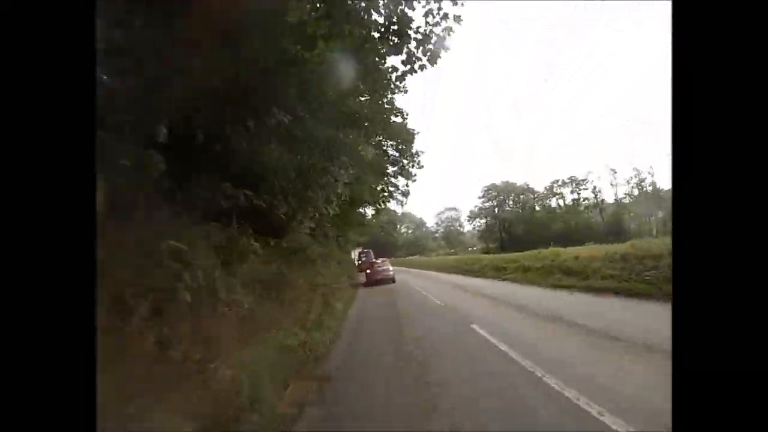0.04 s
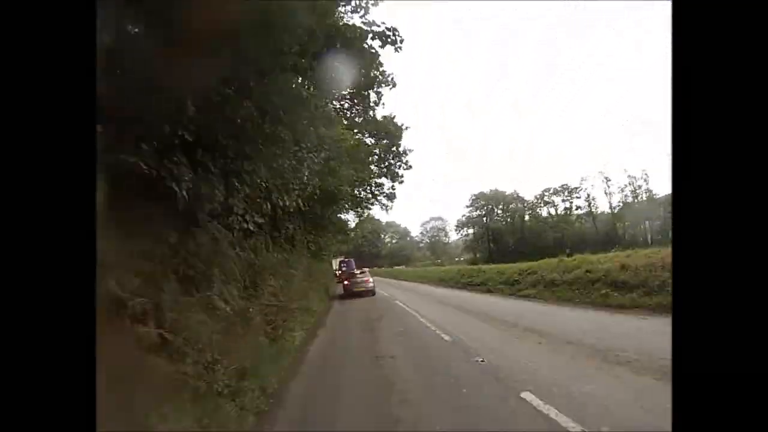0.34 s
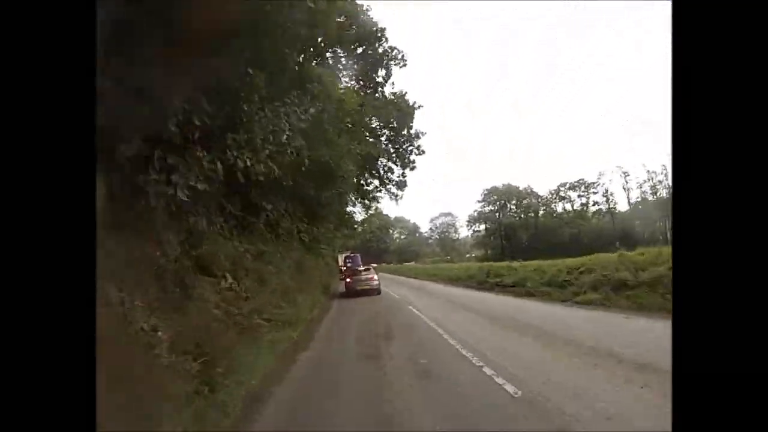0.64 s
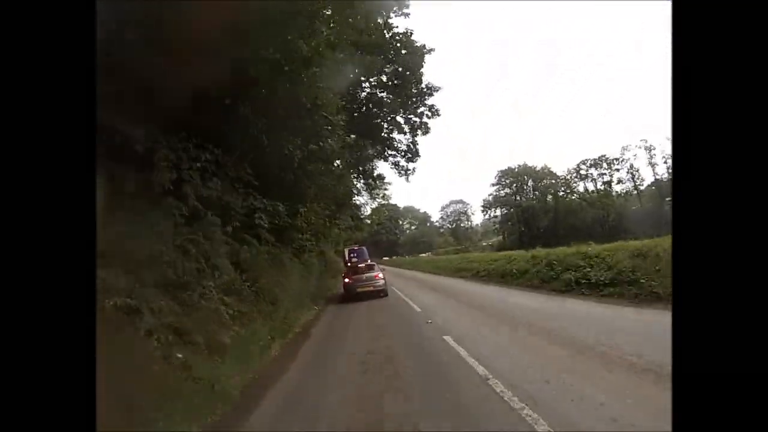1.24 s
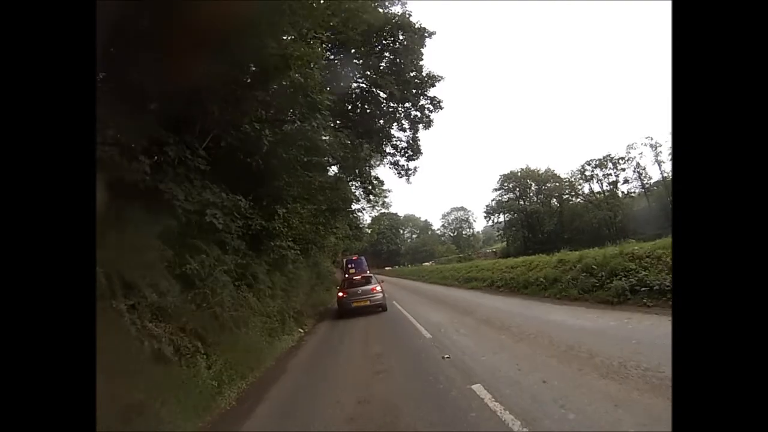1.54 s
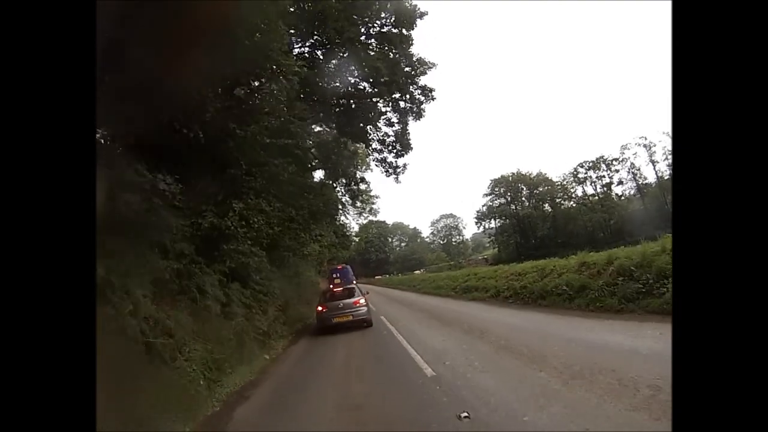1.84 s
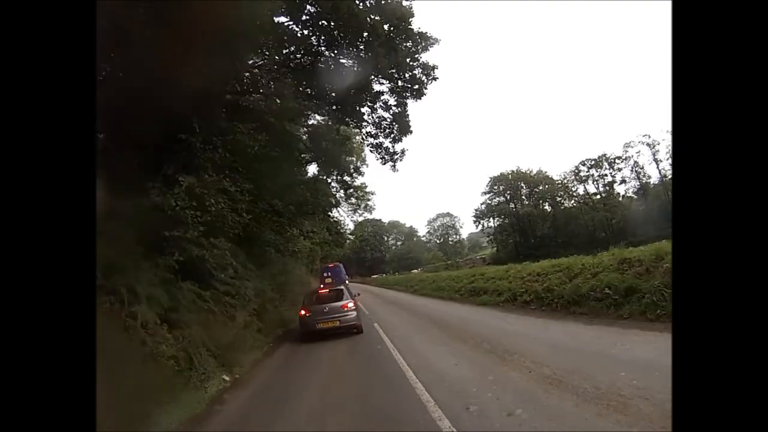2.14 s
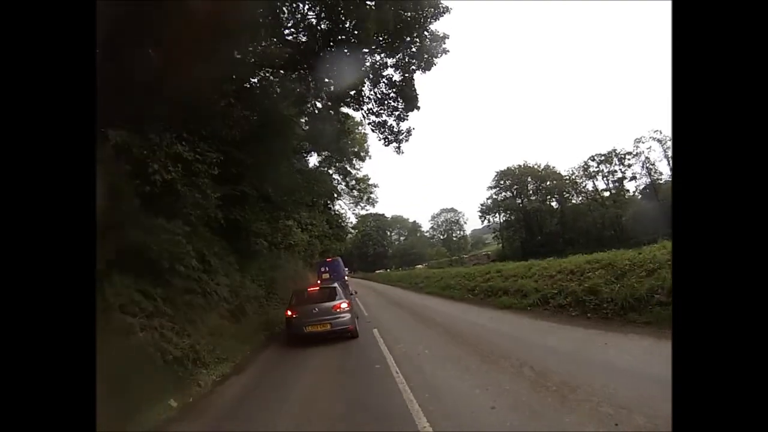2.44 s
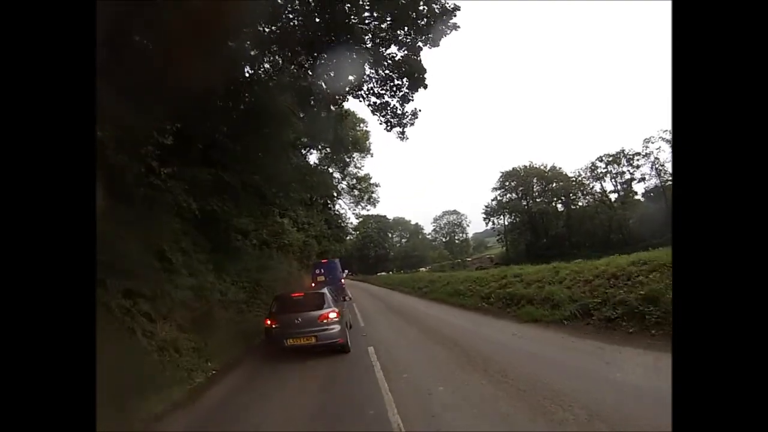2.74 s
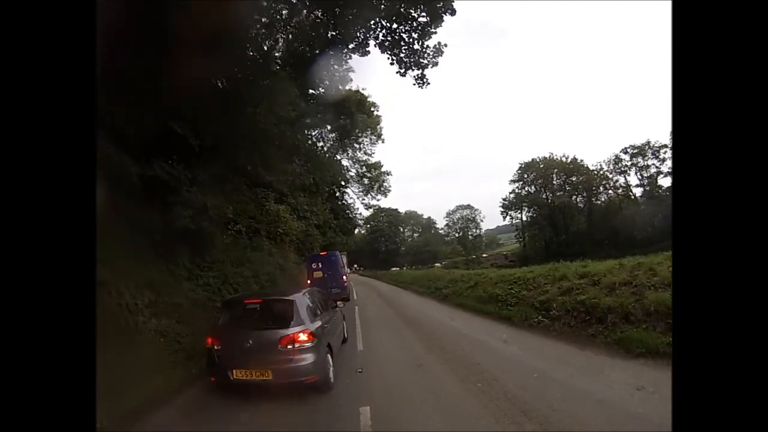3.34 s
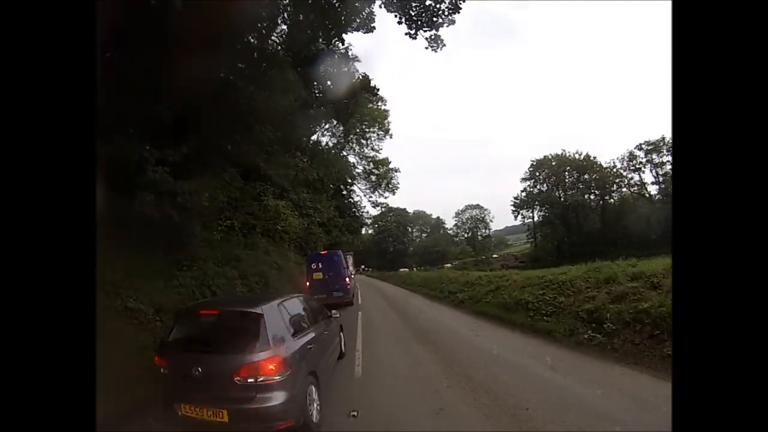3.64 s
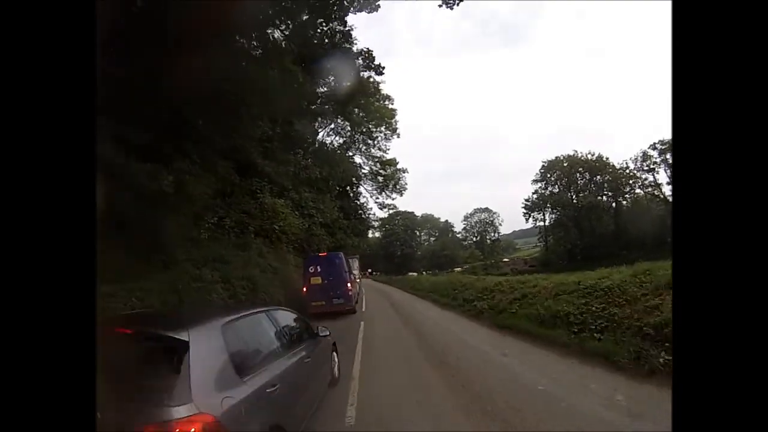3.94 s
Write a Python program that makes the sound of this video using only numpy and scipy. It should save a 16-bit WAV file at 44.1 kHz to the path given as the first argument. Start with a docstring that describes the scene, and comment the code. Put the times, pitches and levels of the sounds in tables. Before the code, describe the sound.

A motorbike's twin-cylinder engine chugs and clatters on a country road, heard from a camera riding along. Wind thumps and tyre rush dominate at first, then fade as the engine slows slightly. Something small knocks the camera housing once.

```python
"""Wind thumps and tyre rush, close on a camera's microphone in a plastic housing, out on the road.
Both die away early, the bright air fastest; then a motorbike's twin-cylinder engine slows a little,
clattering, its paired firings ringing the exhaust pipe in an uneven chug. Early on something small, a
drop or a bit of grit, knocks the housing once; loose parts rattle faintly here and there."""
import sys
import numpy as np
from scipy import signal
from scipy.fft import rfft, irfft, next_fast_len
from scipy.io import wavfile
from scipy.ndimage import uniform_filter1d, map_coordinates

SR = 44100
rng = np.random.default_rng(int(sys.argv[2]) if len(sys.argv) > 2 else 0)


def transcribe(signal):
    """Save signal, clipped to [-1, 1], as a 16-bit WAV file at the path in sys.argv[1]."""
    frames = np.atleast_2d(signal).T
    limited = np.clip(frames, -1, 1)
    pcm = np.round(limited * 32767).astype(np.int16)
    wavfile.write(sys.argv[1], SR, pcm)


N = 176400

# The housing's upper resonances. Each row: frequency in Hz, relative level in dB.
HOUSING_TREBLE = [(2600, -27), (3300, -4.5), (3480, 2.5), (3700, -1.5), (4250, -4), (4900, -0.5),
                  (5400, -4.5), (5700, -9.5), (6100, -8), (6700, -9), (7400, -14), (10000, -23.5),
                  (15000, -43)]


def amp(db):
    """Decibels to gain."""
    return 10 ** (np.asarray(db) / 20)


def unit(x):
    """Scale to rms 1."""
    return x / np.sqrt(np.mean(x ** 2) + 1e-20)


def clock():
    """The time of every sample in seconds."""
    return np.arange(N) / SR


def curves(rows):
    """One value per sample for each column after the time."""
    times, *columns = np.transpose(rows)
    return [np.interp(clock(), times, column) for column in columns]


def wobble(rate):
    """A smooth random curve, rate knots a second."""
    return map_coordinates(rng.standard_normal(4096), [clock() * rate], mode="wrap")


def filtered(x, response):
    """Filter x by a gain given as a function of frequency in Hz."""
    size = next_fast_len(N + SR // 2)
    return irfft(rfft(x, size) * response(np.fft.rfftfreq(size, 1 / SR)), size)[:N]


def noise(colour):
    """Noise of rms 1, coloured by rows of frequency in Hz and relative level in dB."""
    knots_hz, db = np.transpose(colour)
    gain = lambda hz: amp(np.interp(np.log(hz + 1), np.log(knots_hz + 1), db))
    return unit(filtered(rng.standard_normal(N), gain))


def even(x, size):
    """Hold the rms of x near 1 over about size samples."""
    power = uniform_filter1d(uniform_filter1d(x ** 2, size), size // 2)
    return x / np.sqrt(np.abs(power) + 0.0011)


def ring_down(start, attack, t60):
    """A quick rise and an exponential decay; all times in seconds."""
    age = np.maximum(clock() - start, 0)
    return (1 - np.exp(-age / attack)) * amp(-60 * age / t60)


def hiss():
    """A faint, steady hiss behind everything."""
    # Each row: frequency in Hz, relative level in dB.
    hiss_colour = [(1000, -31), (4000, 3.5), (7500, -2), (10000, -4.5), (13000, -8), (15000, -15)]
    return amp(-72) * noise(hiss_colour)


def tick(at_s=1.3875):
    """A faint click with no ring."""
    return amp(-35.5) * (np.arange(N) == round(at_s * SR))


def rattles():
    """Loose parts of the bike chink briefly."""
    # Each row: start in seconds, level in dB, t60 in seconds, bright edge against the body in dB.
    chinks = [(.128, -50, 0.037, 2), (0.942, -46, .03, -7), (1.931, -48, 0.17, -14),
              (2.542, -38.5, 0.024, -22), (2.924, -46, 0.068, -16), (2.961, -44, 0.069, -9.5)]
    # A chink's body and bright edge. Each row: frequency in Hz, relative level in dB.
    body_colour = [(600, -11), (1200, -15), (1550, 1), (1900, -10), (2500, -14), (3200, -12), (4500, -47)]
    edge_colour = [(2000, -22), (4000, 6), (5300, 9), (6700, -1), (8000, -11), (15000, -32)]
    body, edge = noise(body_colour), noise(edge_colour)
    return sum(amp(db) * ring_down(start, 0.0022, t60) * (body + amp(edge_db) * edge)
               for start, db, t60, edge_db in chinks)


def rush():
    """Tyres roar on the road under a brighter rush of air; both fade early, the air faster."""
    # The fade of both. Each row: time in seconds, relative level in dB.
    fade = [(0, -46.5), (.25, -50.5), (.5, -51.5), (1, -53.5), (1.5, -59.5), (2.5, -60), (4, -59.5)]
    # Tyre roar and rushing air. Each row: frequency in Hz, relative level in dB.
    tyre_colour = [(60, -19), (130, 1), (200, -0.5), (300, 0.5), (380, 0), (480, -1), (560, 1), (720, -6.5),
                   (830, -6.5), (940, -16.5), (1500, -35), (4000, -76)]
    air_colour = [(700, -18.5), (950, -14), (1230, -2), (1370, -2), (1510, 1.5), (1770, -5), (2080, -7),
                  (2240, -0.5), (2380, -7.5), (2500, -0.5), (2680, -15.5), (2920, -10.5), (3300, -24.5),
                  (4200, -50)]
    level_db, = curves(fade)
    top_db = level_db.max()
    tyres = noise(tyre_colour) * amp(level_db + 1.5 + 1.27 * wobble(15))
    air = noise(air_colour) + amp(-14.5) * noise(HOUSING_TREBLE)
    air_db = top_db + 4.5 + 1.69 * (level_db - top_db) + 1.2 * wobble(24.35)
    return tyres + air * amp(air_db)


def wind(cycles):
    """Eddies thump, flutter and slap on the housing; the flutter swells with the engine's beat."""
    # Each row: time in seconds, relative levels of the deep thumps and of the flutter in dB.
    buffeting = [(0.03, -27, -33), (0.12, -33.5, -37.5), (0.16, -25.5, -26.5), (0.26, -31, -40),
                 (0.29, -32, -26.5), (0.33, -28, -37.5), (0.44, -39, -55), (0.46, -35.5, -39),
                 (0.54, -33.5, -41.5), (0.76, -26, -39), (0.85, -35.5, -42), (0.92, -25, -37),
                 (1.0, -31.5, -43), (1.02, -33, -35), (1.3, -36.5, -44.5), (1.45, -46.5, -45),
                 (1.6, -37, -48.5), (1.72, -52.5, -46.5), (1.9, -46.5, -45), (2.14, -52.5, -48.5),
                 (2.25, -46.5, -46), (2.38, -50.5, -50), (2.53, -46.5, -42.5), (2.66, -51, -49),
                 (2.8, -44, -43.5), (3.18, -53.5, -50.5), (3.5, -45, -49), (3.65, -53, -50),
                 (3.9, -46, -51)]
    # Single eddies. Each row: start in seconds, level in dB.
    eddies = [(0.138, -20.5), (2.552, -34)]
    # The wind's three colours. Each row: frequency in Hz, relative level in dB.
    thump_colour = [(5, -6.5), (14, -0.5), (27, 3.5), (45, -8.5), (65, -23), (130, -44), (400, -77),
                    (2000, -130)]
    flutter_colour = [(35, -25.5), (60, -2.5), (84, 1), (100, -10.5), (125, -22), (170, -38.5), (220, -33),
                      (500, -80), (2000, -120)]
    slap_colour = [(30, -5), (80, 3), (160, -15), (300, -18.5), (700, -46), (2000, -120)]
    thump_db, flutter_db = curves(buffeting)
    calm = (thump_db.max() - thump_db) / np.ptp(thump_db)
    thumps = even(noise(thump_colour), size=4000)
    thumps *= amp(thump_db + 3 + 1.5 * calm * wobble(6.26))  # more fitful in slow air
    beat_db = 0.5 * np.cos(2 * np.pi * (cycles + 0.12))  # peaks just ahead of the first firing
    flutter = even(noise(flutter_colour), size=3500) * amp(flutter_db + beat_db)
    slap_envelope = sum(amp(db) * ring_down(start, attack=0.004, t60=0.079) for start, db in eddies)
    slaps = even(noise(slap_colour), size=800) * slap_envelope
    return thumps + flutter + slaps


def knock(start_s=0.7948, build_periods=3.8):
    """A drop or a bit of grit cracks on the housing and rings it; the low modes bloom last."""
    # Each row: frequency in Hz, relative level in dB, t60 in seconds.
    housing_modes = [(493, -1, 0.024), (790, -2.5, 0.029), (1222, -3, 0.052), (1480, -16, 0.041),
                     (1990, -2.5, 0.026), (2230, 4, 0.028), (2512, -4, 0.044), (2787, -6.5, 0.025)]
    # The first snap. Each row: frequency in Hz, relative level in dB.
    crack_colour = [(200, -2), (700, 3), (1700, 7), (2800, 2.5), (3400, 0), (5300, -15), (5800, -32),
                    (7000, -50)]
    age = clock() - start_s
    ring = np.zeros(N)
    for hz, db, t60 in housing_modes:
        tone = np.sin(2 * np.pi * hz * age + rng.uniform(0, 2 * np.pi))
        ring += amp(db) * tone * ring_down(start_s, build_periods / hz, t60)
    crack = even(noise(crack_colour), size=130) * ring_down(start_s, attack=0.00097, t60=0.013)
    return amp(-24) * (ring + amp(1.5) * crack)


def clatter(cycles, stroke_drop_db=5.5, fall_db_per_s=0.23):
    """Valve and piston noise jumps at each of the four strokes and dies down until the next."""
    # Each row: frequency in Hz, relative level in dB.
    metal_colour = [(500, -14), (800, -19.5), (930, -11), (1100, 0.5), (1300, -8), (1490, 2), (1700, -3),
                    (1800, -14.5), (1890, -4), (1970, -11), (2100, -4.5), (2350, -3.5), (2510, 1.5),
                    (2690, -16), (2930, -8.5), (3240, -21), (4200, -58)]
    stroke_phase = uniform_filter1d((4 * cycles - 0.16) % 1, size=90)
    swing_db = -stroke_drop_db * stroke_phase + 0.7 * np.cos(2 * np.pi * cycles) + 0.65 * wobble(110)
    grind = noise(metal_colour) + amp(-13.5) * noise(HOUSING_TREBLE)
    return unit(grind * amp(swing_db)) * amp(-53.235 - fall_db_per_s * clock())


def burns(cycles, place, jitter_s=0.00012, scatter_db=1):
    """One cylinder fires once a cycle, each pulse a little different in time and strength."""
    firing_cycles = np.arange(1, int(cycles[-1] - place) + 1) + place
    times = np.interp(firing_cycles, cycles, clock())
    late, strength = rng.standard_normal((len(times), 2)).T
    index = np.clip(np.round((times + jitter_s * late) * SR), 0, N - 1).astype(int)
    return np.bincount(index, amp(scatter_db * strength), N)


def silencer(pulses, modes, muffle_hz=1100):
    """The silencer dulls the pulses and they ring the given resonances; scaled to rms 1."""
    def response(f):
        return sum((-1) ** k * amp(db) * 1j * f * width / (hz * hz - f * f + 1j * f * width)
                   for k, (hz, width, db) in enumerate(modes))
    muffled = signal.sosfilt(signal.butter(2, muffle_hz, fs=SR, output="sos"), pulses)
    return unit(filtered(muffled, response))


def exhaust(cycles, rise_db_per_s=0.03):
    """A pair of pulses rings the pipe, then a long gap follows; a low boom marks each cycle."""
    # Two cylinders, half a turn apart. Each row: place as a share of the cycle, relative level in dB.
    firings = [(-.07, -4.5), (.18, -2.5)]
    # Resonances of pipe and boom. Each row: frequency in Hz, width in Hz, relative level in dB.
    pipe_modes = [(229.3, 14, 3.5), (276, 18.6, 0), (337, 24, -7), (572, 49, -14)]
    boom_modes = [(14.1, 3.6, -14), (41.3, 11.7, -4), (81, 30, -1)]
    pulses = [amp(db) * burns(cycles, place) for place, db in firings]
    chug = amp(-57.5) * silencer(sum(pulses), pipe_modes)
    boom = amp(-53) * silencer(pulses[0], boom_modes)
    return (chug + boom) * amp(rise_db_per_s * (clock() + 1))


def scene():
    """Engine, road, wind and small knocks, all at one microphone."""
    # Each row: time in seconds, engine speed in four-stroke cycles per second.
    engine_speed = [(0, 14.65), (1, 14.68), (1.5, 14.69), (2, 13.87), (2.5, 13.63), (3, 13.56),
                    (3.5, 13.35), (4, 13.3)]
    cycle_rate, = curves(engine_speed)
    cycles = np.cumsum(cycle_rate) / SR
    engine = exhaust(cycles) + clatter(cycles)
    return (engine + rush() + wind(cycles) + knock() + rattles() + tick() + hiss())[None]


def record(dry):
    """The camera hears in mono and passes nothing above 15.2 kHz."""
    return filtered(dry[0], lambda hz: hz < 15200)[None]


dry = scene()
out = record(dry)
transcribe(out)
```